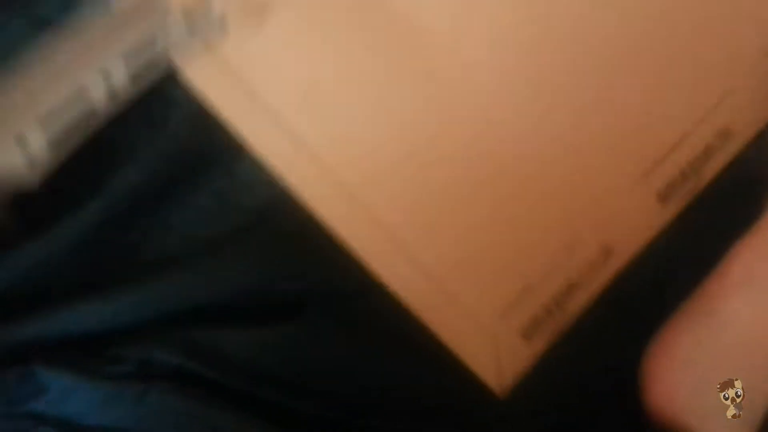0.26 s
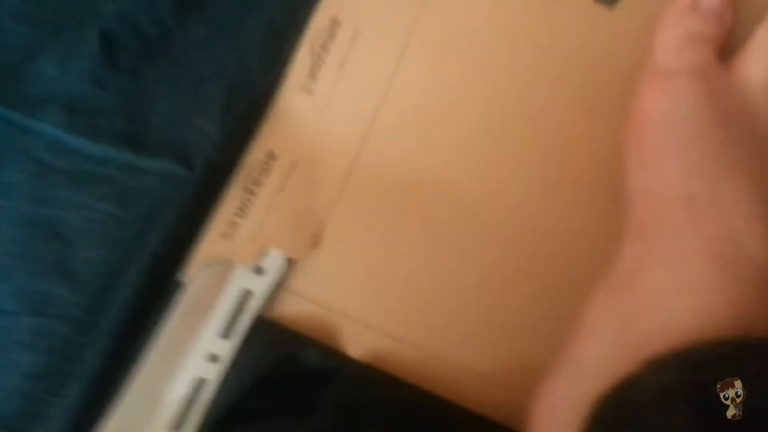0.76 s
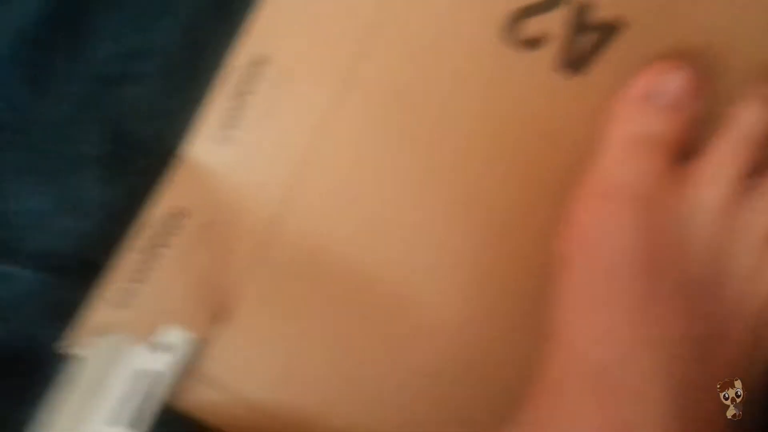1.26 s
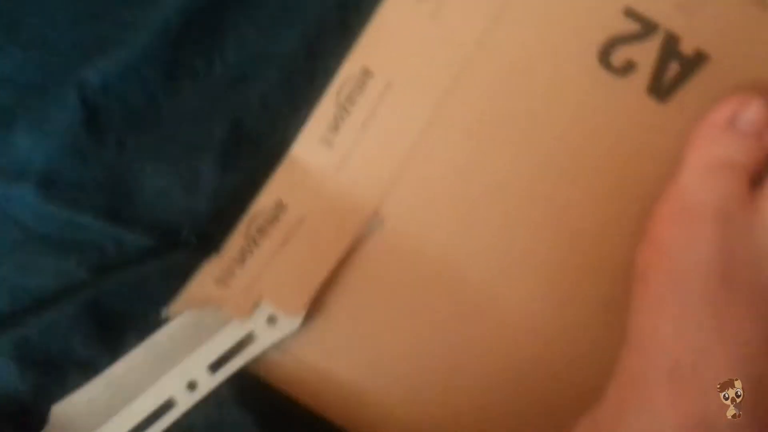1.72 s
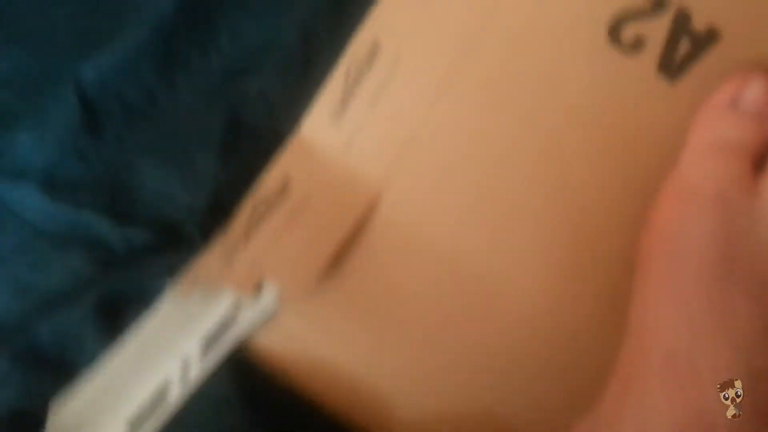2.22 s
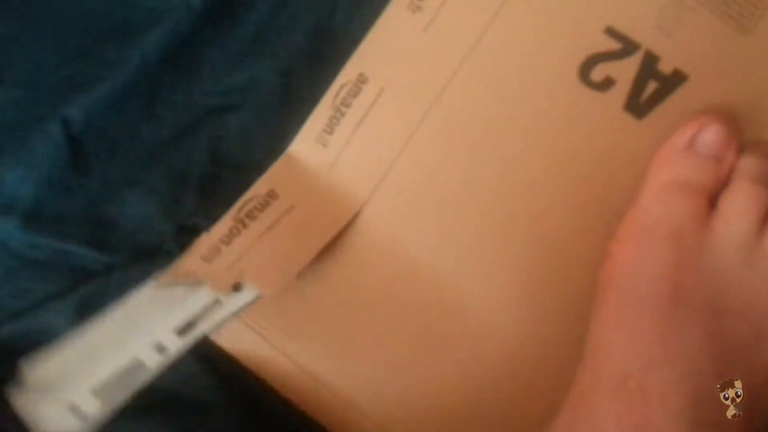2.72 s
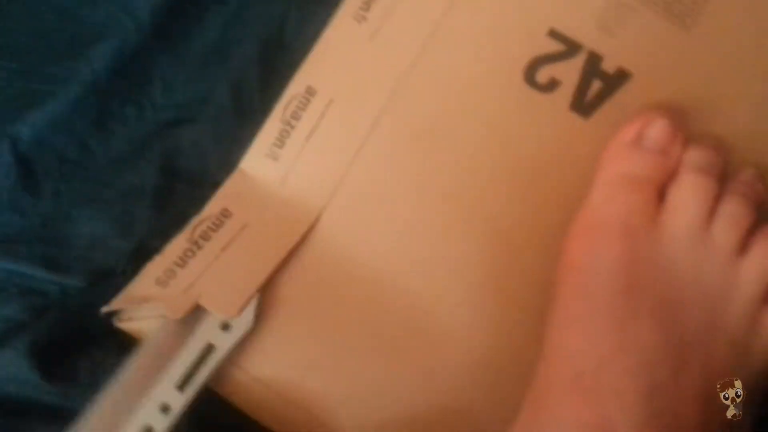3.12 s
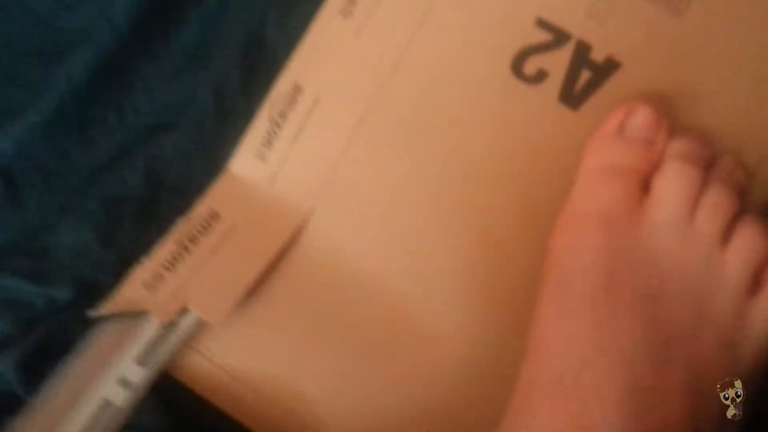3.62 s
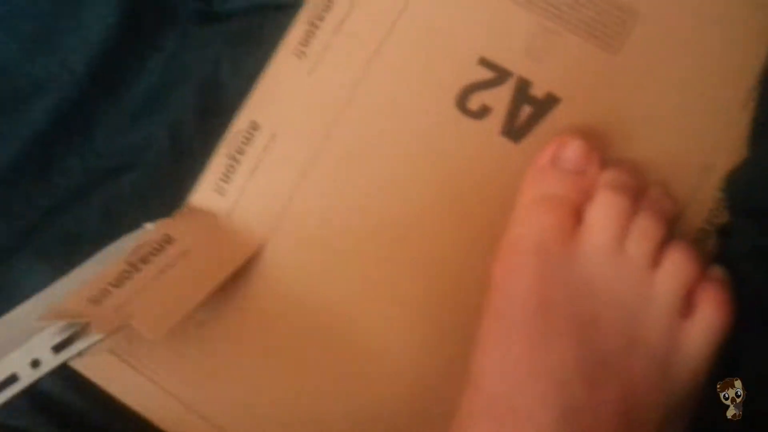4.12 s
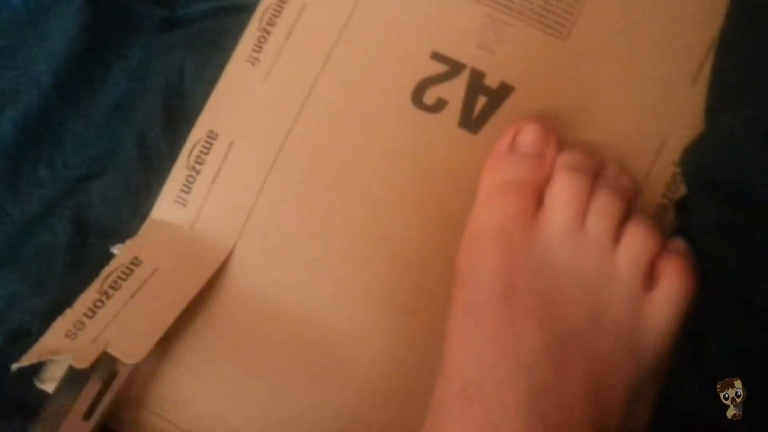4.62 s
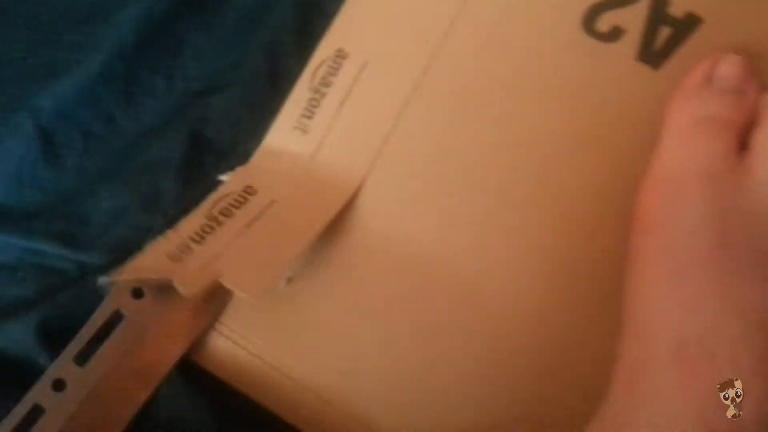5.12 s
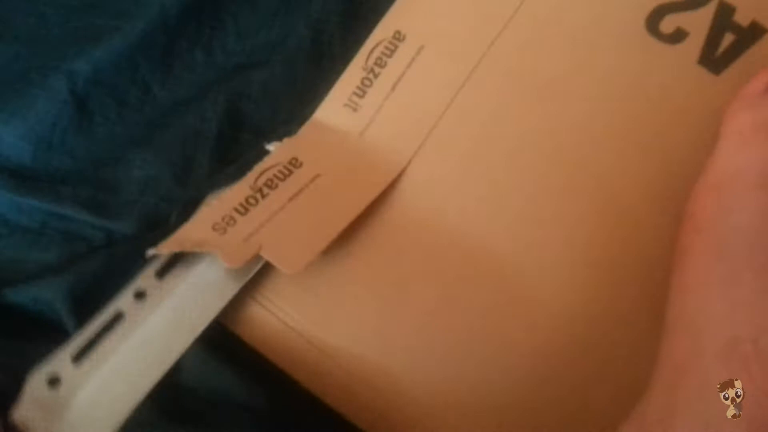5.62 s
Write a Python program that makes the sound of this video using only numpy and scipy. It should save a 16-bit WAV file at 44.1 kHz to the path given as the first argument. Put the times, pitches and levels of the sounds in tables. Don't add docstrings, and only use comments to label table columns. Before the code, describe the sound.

A short drag and knock open, then light fumbling, then a hard crackling rip. Quick sawing strokes follow, dry and grainy, with popping fibres and a low boxy panel rumble. After quieter ticks and rubs comes another burst of loud tearing before small handling sounds. Close stereo phone pickup, dry soft-furnished room, faint electronic whine.

```python
import sys
import numpy as np
from scipy import signal
from scipy.fft import rfft, irfft, next_fast_len
from scipy.io import wavfile
from scipy.ndimage import uniform_filter1d, map_coordinates

SR = 44100
rng = np.random.default_rng(int(sys.argv[2]) if len(sys.argv) > 2 else 0)


def wav_record(signal):
    frames = np.transpose(np.atleast_2d(signal))
    bounded = np.clip(frames, -1, 1)
    quanta = np.round(bounded * 32767).astype(np.int16)
    wavfile.write(sys.argv[1], SR, quanta)


def level_to_linear(level):
    exponent = np.asarray(level, float) / 20
    return 10 ** exponent


N = 258426


def unit(x):
    return x / np.sqrt(np.mean(x ** 2, axis=-1, keepdims=True) + 1e-20)


def along(points, f_hz):
    hz, db = np.transpose(points)
    return level_to_linear(np.interp(np.log(f_hz + 1), np.log(hz + 1), db))


def filtered(x, response):
    m = next_fast_len(N + 8192)
    return irfft(rfft(x, m) * response(np.fft.rfftfreq(m, 1 / SR)), m)[..., :N]


def resonance(f, hz, width_hz):
    return 1j * f * width_hz / (hz * hz - f * f + 1j * f * width_hz)


def wobble(rate_hz):
    knots = rng.standard_normal(int(N * rate_hz / SR) + 4)
    return map_coordinates(knots, [np.arange(N) * rate_hz / SR])


def curves(rows):
    s, *cols = np.transpose(rows)
    return [np.interp(np.arange(N) / SR, s, c) for c in cols]


def add(out, start_s, sound):
    part = out[..., round(start_s * SR):][..., :sound.shape[-1]]
    part += sound[..., :part.shape[-1]]


def grains(rate_hz, spread_db, clump_db, alike):
    size = level_to_linear(spread_db * np.minimum(rng.exponential(size=(3, N)), 3.5)) * rng.standard_normal((3, N))
    hits = size * (rng.random((3, N)) < rate_hz / SR)
    both, *own = hits + 0.42 * rng.standard_normal((3, N))
    stereo = np.sqrt(alike) * both + np.sqrt(1 - alike) * np.array(own)
    return level_to_linear(clump_db * (0.54 * wobble(45) + wobble(260))) * stereo


def strokes():
    # start_s, pocket_hz, board_load_db, blade_flat_db
    flap = [(0, 4340, -0.5, 3.5), (.6, 4300, -4.5, 2), (.85, 4020, 2.9, 0.5), (1.0, 4900, -0.3, 0.5),
            (1.45, 3900, 4, -0.5), (1.75, 3800, 1, 5), (2.04, 4470, -0.9, -0.1), (2.5, 3920, 1.8, 1.5),
            (2.87, 3250, 1.4, -2.5), (3.05, 4300, -1.7, 2), (3.42, 3570, -1, -0.2), (3.75, 3560, -1, -2),
            (4.1, 3800, -1.1, 1.5), (4.6, 3800, -3, -0.7), (4.83, 3170, 3, -0.5), (5.02, 5350, 4, 0),
            (5.15, 3750, -1.5, -1.5), (5.5, 5000, 0.3, -0.2)]
    medium_db, lift_s, open_db = -32, 0.9, 2.1
    tear_from_db, tear_range_db = -37, 14.5
    t = np.arange(N) / SR
    pocket_hz, load_db, flat_db = curves(flap)
    turning_db = uniform_filter1d(hand_db(), size=SR // 80)
    stroke_db = 20 * np.log10(level_to_linear(turning_db) + rip_level())
    force_db = stroke_db - medium_db

    tearing = np.clip((stroke_db - 2.1 * flat_db - tear_from_db) / tear_range_db, 0.25, 1)
    fibre = grains(7000, spread_db=1.8 * tearing, clump_db=1.87 * tearing, alike=0.16)
    fibre = patches(fibre, patchy_db=1.4 + 1.32 * tearing)

    scrape_db = -10.5
    fizz_db = -9 - 0.15 * force_db + flat_db
    rub_db = -10 - 0.17 * force_db + load_db
    opening_db = open_db * np.clip(t - lift_s, 0, 1)
    panel_db = -15.3 - 0.24 * force_db + 1.48 * load_db + opening_db
    panel_db = np.minimum(panel_db, -9)

    layers = level_to_linear(scrape_db) * pocket_scrape(fibre, pocket_hz) + level_to_linear(fizz_db) * fibre_fizz(fibre)
    layers = layers + level_to_linear(rub_db) * board_rub() + level_to_linear(panel_db) * panel_rumble()
    return level_to_linear(stroke_db) * layers


def hand_db():
    # peak_s, peak_db, rise_20db_s, fall_20db_s
    saws = [(.19, -35, .15, 0.04), (.86, -47, 8, -5), (1.945, -39, 0.05, .05), (1.629, -25, .15, 0.07),
            (1.876, -33.5, .04, .09), (2.042, -18, .044, .028), (2.172, -20.5, .055, 0.0744),
            (2.33, -25.5, .086, .065), (2.61, -34, .114, 0), (2.794, -18, 0.14, .17),
            (3.05, -26, .077, 0.09), (3.259, -18.5, 0.0152, 0.0537), (3.328, -23, .11, 0.06),
            (3.47, -28, 0, .092), (4.08, -18.5, .074, 0.117), (4.128, -20.5, .11, 0.08),
            (4.54, -35.5, .12, .075), (4.592, -44, .1, .015), (4.65, -55, .4, .4),
            (5.038, -16, 0.0639, 0.07), (5.136, -19.5, 0.0749, 0.0662), (5.175, -26.5, -0.02, 0.05),
            (5.45, -36.5, -0.2, .07), (5.86, -34, 0.07, -4)]
    # start_s, end_s, first_db, last_db, edge_20db_s
    drags = [(0, 0.112, -23.5, -25.5, 0.05), (.315, 0.613, -33, -27.5, 0.13), (.7, 0.773, -35, -36.5, 0.03),
             (1.267, 1.34, -34, -38.5, 0.06), (0.901, 1.142, -34, -30.5, .05),
             (1.469, 1.548, -20.5, -25, .038), (1.678, 1.763, -28.5, -28, 0.04),
             (1.801, 1.861, -46.5, -48.5, .06), (2.055, 2.094, -24.5, -27.5, .03),
             (2.428, 2.46, -22.5, -24, .062), (2.5, 2.55, -38, -46, -2), (3.13, 3.23, -45, -42.5, 0.06),
             (3.393, 3.462, -28, -22, 0.0041), (3.746, 3.781, -27.5, -30, .065),
             (3.821, 4.031, -41, -32.5, .08), (4.201, 4.271, -36.5, -48.8, .06),
             (4.281, 4.341, -48.8, -41.2, -0.01), (4.361, 4.441, -32.8, -33.2, .045),
             (4.731, 4.801, -27.2, -26.2, .052), (4.851, 4.961, -41.2, -44.5, .031),
             (5.21, 5.34, -35, -38.5, 0.15), (5.351, 5.421, -31.5, -27, .065),
             (5.552, 5.64, -60.5, -51, -4.3), (5.707, 5.776, -32, -31.5, .06)]
    t = np.arange(0, N / SR, 0.001)
    moves = [(s, s + 0.00068, db, db, up, down) for s, db, up, down in saws]
    moves += [(*row, row[-1]) for row in drags]
    levels = []
    for a, b, first_db, last_db, up, down in moves:
        corners_s = [a - 4 * abs(up), a, b, b + 4 * abs(down)]
        levels.append(np.interp(t, corners_s, [first_db - 80, first_db, last_db, last_db - 80]))
    return np.interp(np.arange(N) / SR, t, np.max(levels, axis=0))


def rip_level():
    # start_s, peak_db, length_s
    rips = [(0.173, -31.5, 0.025), (1.465, -28, 0.013), (1.518, -30, 0.031), (2.019, -21.5, 0.028),
            (2.146, -30.5, 0.063), (2.21, -37.5, 0.03), (2.316, -39.5, 0.051), (2.426, -37, 0.06),
            (2.577, -40, 0.047), (2.941, -37, 0.034), (3.026, -37, 0.02), (3.262, -23, 0.014),
            (3.407, -34.5, 0.054), (3.656, -51, 0.044), (4.102, -37, 0.025), (4.705, -38, 0.11),
            (4.97, -33, 0.027), (5.096, -33, 0.068), (5.346, -32, 0.073), (5.677, -45, 0.024)]
    t = np.arange(N) / SR
    level = np.zeros(N)
    for start_s, db, length_s in rips:
        attack = np.clip((t - start_s) / 0.0054, 0, 1)
        stop = np.clip((start_s + length_s - t) / 0.0023, 0, 1)
        level += level_to_linear(db) * attack * stop
    return level


def patches(x, patchy_db):
    z = signal.stft(x, nperseg=256)[2]
    field = uniform_filter1d(rng.standard_normal(z.shape[1:]), size=3, axis=0)
    field = uniform_filter1d(field, size=9, axis=1)
    depth_db = np.interp(np.linspace(0, N, z.shape[2]), np.arange(N), patchy_db)
    return signal.istft(z * level_to_linear(depth_db * field / field.std()), nperseg=256)[1][:, :N]


def pocket_scrape(fibre, pocket_hz):
    zones_hz = np.array([2960, 3540, 4150, 4860])
    share = np.exp(-(np.log(pocket_hz / zones_hz[:, None]) / 0.29) ** 2) + 1e-6
    share = share / np.linalg.norm(share, axis=0)
    hz = zones_hz[:, None, None]
    zones = unit(filtered(fibre, lambda f: resonance(f, hz, 0.41 * hz) ** 2))
    return np.sum(share[:, None] * zones, axis=0)


def fibre_fizz(fibre):
    # freq_hz, level_db
    fizz_points = [(4000, -48), (6000, -2.5), (7500, -0.5), (10000, -4.5), (12000, -7.5), (14000, -17),
                   (16000, -9)]
    return unit(filtered(fibre, lambda f: along(fizz_points, f)))


def board_rub():
    # freq_hz, level_db
    rub_points = [(200, -19), (400, 3), (1000, 1), (1800, -1.5), (2400, -0.5), (3500, -11.5)]
    contacts = grains(3000, spread_db=2.5, clump_db=1.0, alike=0.37)
    return unit(filtered(contacts, lambda f: along(rub_points, f)))


def panel_rumble():
    # freq_hz, width_hz, level_db
    modes = [(151, 65, -2), (248.4, 71, 1), (365, 270, -8), (61.4, 39, -11.5)]

    def hollow(f):
        return sum((-1) ** k * level_to_linear(db) * resonance(f, hz, w) for k, (hz, w, db) in enumerate(modes))

    return unit(filtered(grains(400, spread_db=4, clump_db=3.5, alike=0.67), hollow))


def snaps():
    # start_s, peak_db, pitch_hz
    fibre_snaps = [(1.4538, -14, 3730), (1.4648, -4.5, 4830), (1.4753, -14, 3540), (1.4856, -11, 4400),
                   (1.515, -2, 4950), (1.6833, -10, 7200), (2.0393, -8.5, 4600), (2.0428, -5, 4700),
                   (2.1705, -10.5, 4900), (2.1964, -6, 4660), (2.775, -21, 3800), (2.805, -8.5, 3480),
                   (2.8674, -8.5, 2580), (2.9413, -15, 3460), (3.0534, -11, 4330), (3.2625, -19, 4680),
                   (3.276, -9, 4960), (4.7132, -15, 3450), (5.0292, -1, 5070), (5.044, -13, 4930),
                   (5.0919, -6.5, 3100), (5.1703, -10.5, 3550), (5.3485, -11, 4960)]
    # start_s, peak_db, pitch_hz
    edge_ticks = [(0.748, -25, 1800), (4.423, -17.5, 3560), (3.9, -22, 3600), (1.801, -28, 4830),
                  (1.8302, -15, 4700), (1.8776, -18, 7000), (2.61, -13.5, 4570), (3.024, -11.5, 5600),
                  (3.686, -22, 4500), (3.996, -14.5, 6660), (4.356, -13, 3370), (4.404, -13, 9100),
                  (4.6887, -36, 3460), (4.931, -19.5, 4270), (5.2674, -18.5, 4890), (5.2966, -17, 3760),
                  (5.325, -16, 5030), (5.5969, -28, 5470), (5.6877, -16, 5300)]
    out, t = np.zeros((2, N)), np.arange(SR // 40) / SR
    for rows, t60_s, click_share in [(fibre_snaps, 0.012, 1.36), (edge_ticks, 0.0073, 1.95)]:
        for start_s, db, hz in rows:
            noise = rng.standard_normal((3, len(t)))
            rough_phase = np.cumsum(0.15 * noise[2])
            ring = np.sin(2 * np.pi * hz * t + rough_phase) * level_to_linear(-60 * t / t60_s)
            crack = (noise[:2] + 0.46 * noise[2]) * level_to_linear(-60 * t / 0.0043)
            onset = 1 - np.exp(-t / 0.00015)
            add(out, start_s, level_to_linear(db - 11.5) * (ring + click_share * crack) * onset)
    return filtered(out, lambda f: 1 / (1 + (f / 12500) ** 4))


def thumps():
    # start_s, peak_db, pitch_hz, t60_s
    jolts = [(0.113, -15, 169, 0.046), (0.184, -33.5, 413, 0.064), (0.912, -17, 242, 0.024),
             (1.47, -14.5, 354, 0.041), (1.49, -11, 159, 0.058), (1.524, -15.5, 170, 0.048),
             (2.04, -26.5, 158, 0.1), (2.166, -22.5, 253.6, 0.14), (2.447, -18, 185, 0.06),
             (2.586, -32, 208, 0.064), (2.701, -24.5, 254, 0.075), (2.751, -20, 222, 0.053),
             (3.026, -27, 213, 0.05), (3.276, -7.5, 205, 0.03), (3.462, -13, 187, 0.05),
             (3.931, -22, 230, 0.022), (4.083, -27.5, 397, 0.077), (4.809, -30, 218, 0.12),
             (4.977, -29, 242, 0.085), (5.195, -27, 149, 0.051), (5.687, -19.5, 205, 0.029)]
    # start_s, peak_db, pitch_hz
    small_thumps = [(0.686, -35, 299), (0.69, -32, 590), (0.745, -35.5, 396), (0.772, -40, 272),
                    (0.796, -36, 207), (0.828, -33, 293), (0.901, -24.5, 367), (0.906, -23, 297),
                    (1.271, -32, 372), (1.603, -31, 392), (2.808, -33, 280), (2.94, -25.5, 236),
                    (3.28, -21.5, 420), (3.94, -35, 390), (4.444, -35, 144), (4.651, -34, 223),
                    (4.879, -34, 410), (4.902, -28, 145), (4.931, -28, 350), (5.269, -27, 212),
                    (5.296, -27.5, 144), (5.349, -23.5, 405), (5.416, -32, 387), (5.83, -32, 296)]
    jolt_dip, small_dip, small_t60_s = 0.51, 0.75, 0.038
    out, t = np.zeros((2, N)), np.arange(SR // 8) / SR
    events = [(*row, jolt_dip) for row in jolts]
    events += [(*row, small_t60_s, small_dip) for row in small_thumps]
    tug = t / 0.00035 * np.exp(1 - t / 0.00035)
    for start_s, db, hz, t60_s, dip in events:
        fade = level_to_linear(-60 * t / t60_s) * (1 - np.exp(-t / 0.0035))
        swing = np.sin(2 * np.pi * hz * t * (1 - 1.66 * t))
        swing = swing + 0.39 * fade * np.sin(2 * np.pi * 1.94 * hz * t)
        knock = signal.lfilter([0.09], [1, -0.91], rng.standard_normal((2, len(t)))) * fade
        add(out, start_s, -level_to_linear(db + 3.0) * (swing * fade + 1.14 * knock + dip * tug))
    return filtered(out, lambda f: (1j * f / (90 + 1j * f)) ** 2)


def room():
    # freq_hz, level_db
    air_points = [(20, 31), (60, 30), (200, 19), (1000, -14), (4000, -73), (9000, -9), (14000, 15)]
    a, b, c = rng.standard_normal((3, N))
    air = unit(filtered(np.array([a + 0.47 * c, b + 0.82 * c]), lambda f: along(air_points, f)))
    whine_noise = np.array([c + 0.5 * a, c + 0.76 * b])
    whine = unit(filtered(whine_noise, lambda f: resonance(f, 9500, 450) ** 2))
    return level_to_linear(-59.5) * air + level_to_linear(-61.5 + 1.3 * wobble(6)) * whine


def scene():
    return strokes() + snaps() + thumps() + room()


def band_limit(x):
    return signal.sosfilt(signal.butter(12, 16190, fs=SR, output="sos"), x)


def record(dry):
    # freq_hz, width_hz, level_db
    ports = [
        [(3430, 1620, 10), (4830, 1170, 6.5), (6860, 320, -13)],
        [(7120, 1170, 9)],
    ]
    clip_level, top_hz = 0.92, 15750

    def colour(f):
        return np.array([1 + sum(level_to_linear(db) * resonance(f, hz, w) for hz, w, db in port) for port in ports])

    def lag(f):
        delay_s = np.clip(f / 3000, 0, 1) * np.array([[0.0001], [0]])
        return np.exp(-2j * np.pi * f * delay_s)

    balance = level_to_linear([[0.8], [-0.8]])
    heard = filtered(dry, lambda f: colour(f) * lag(f) * balance)
    heard = filtered(np.clip(heard, -clip_level, clip_level), lambda f: f < top_hz)
    return band_limit(heard)


dry = scene()
out = record(dry)
wav_record(out)
```